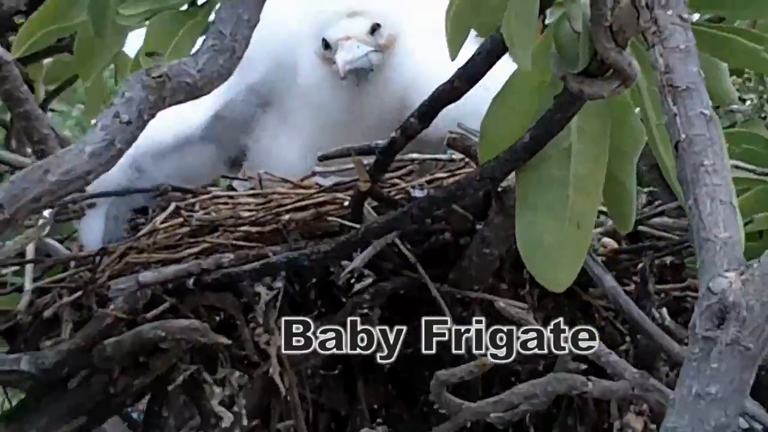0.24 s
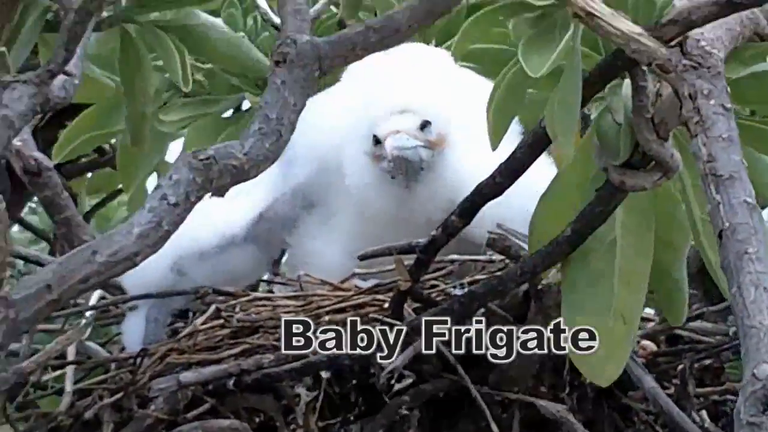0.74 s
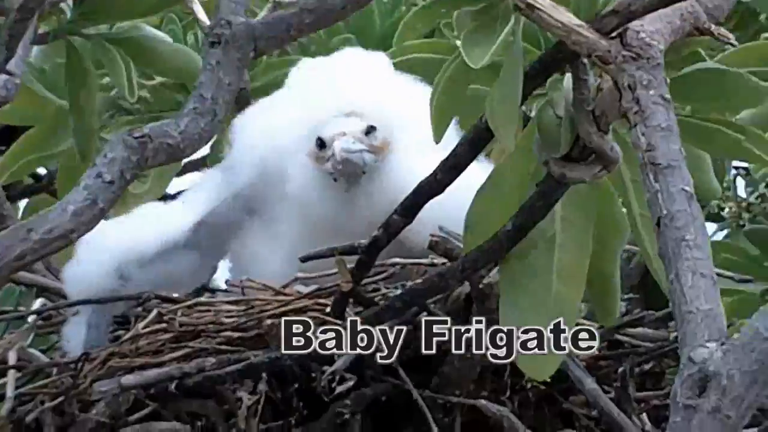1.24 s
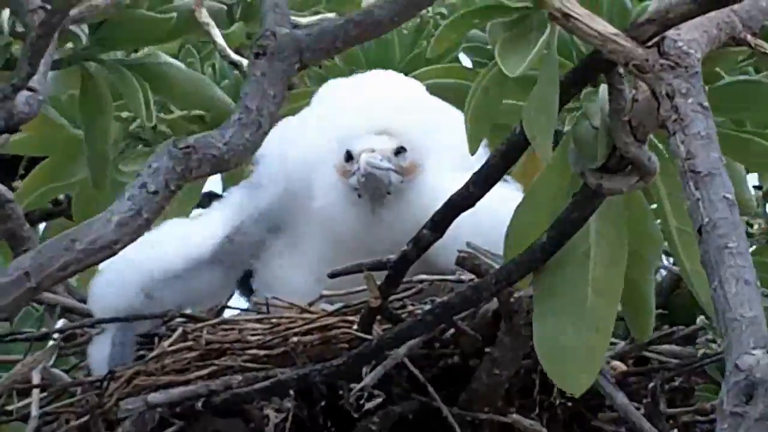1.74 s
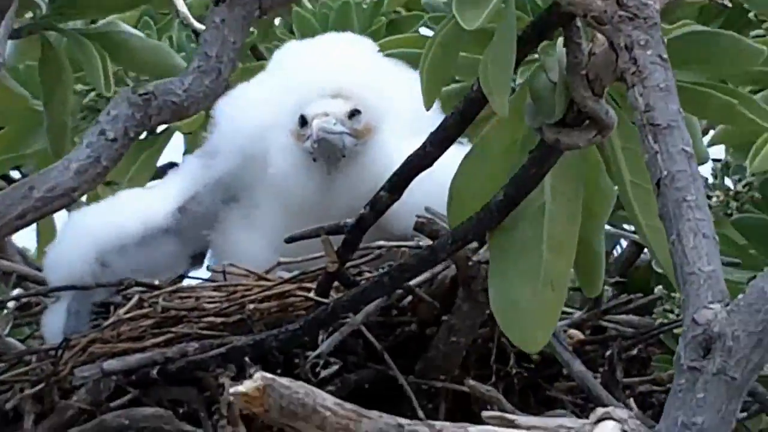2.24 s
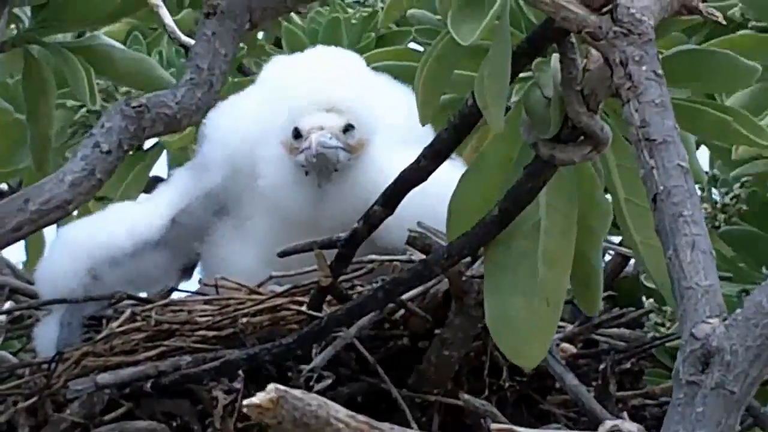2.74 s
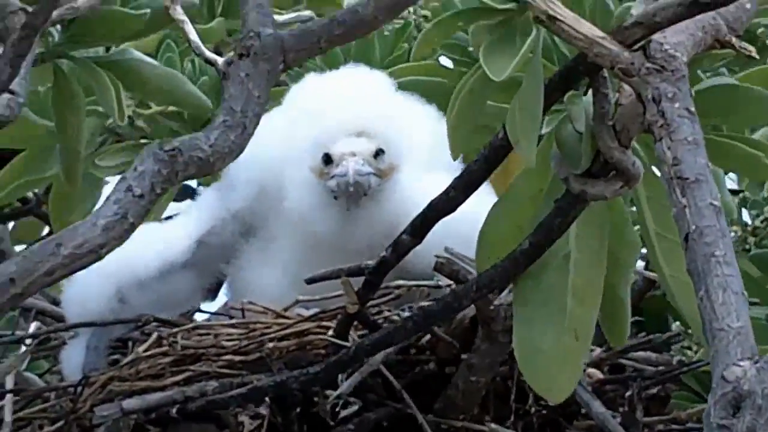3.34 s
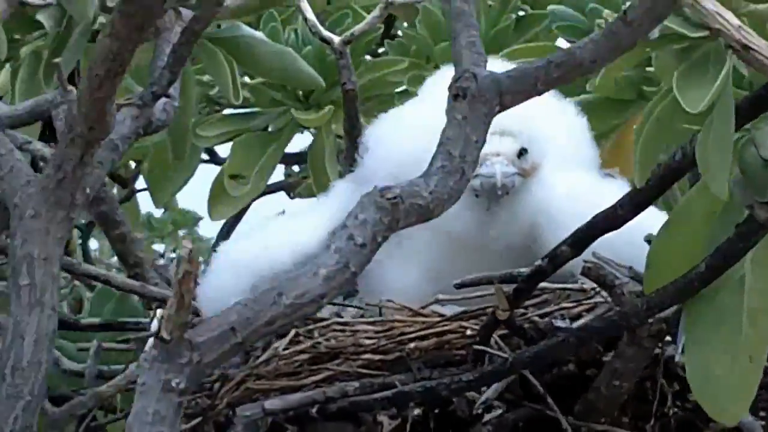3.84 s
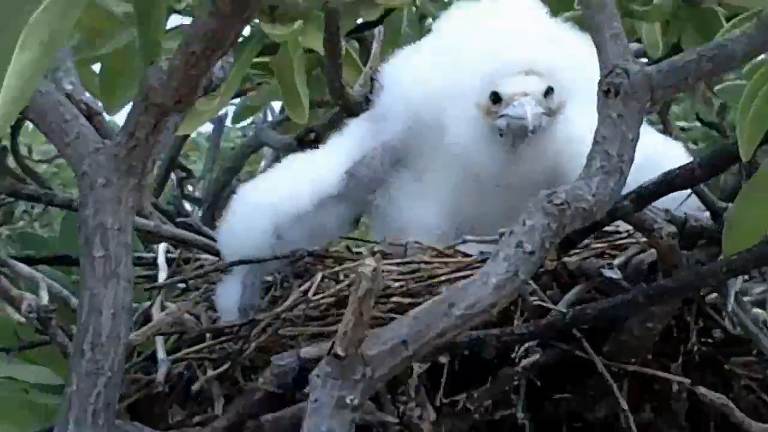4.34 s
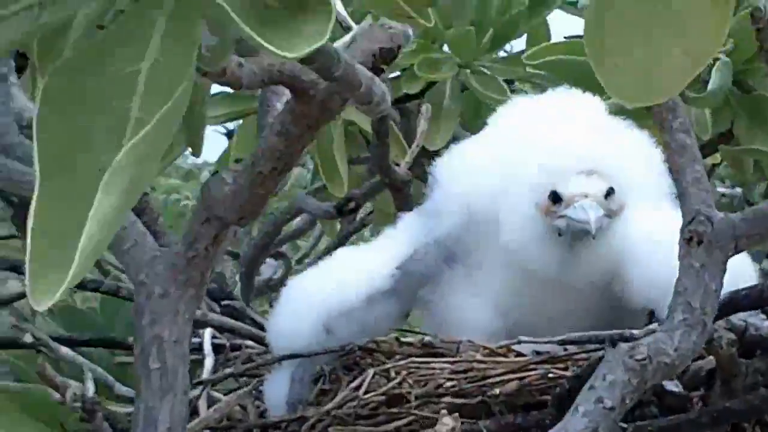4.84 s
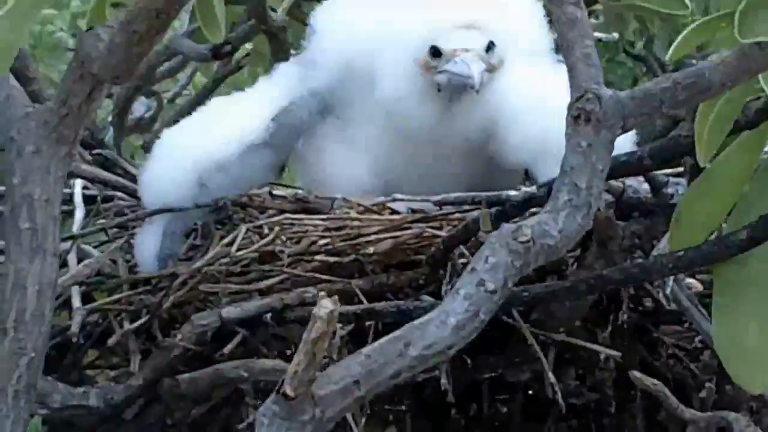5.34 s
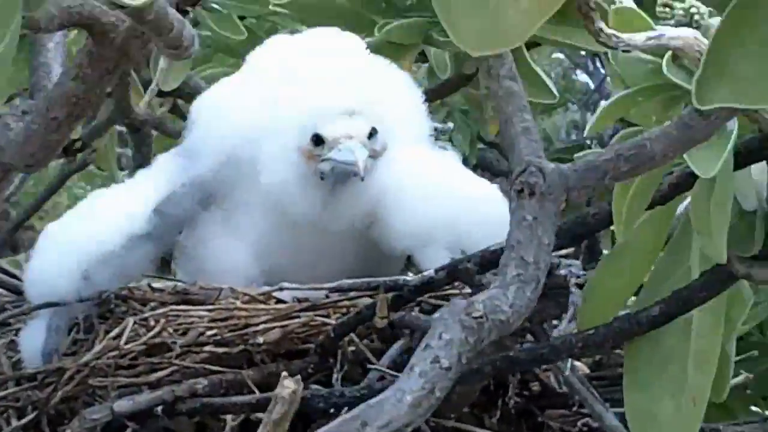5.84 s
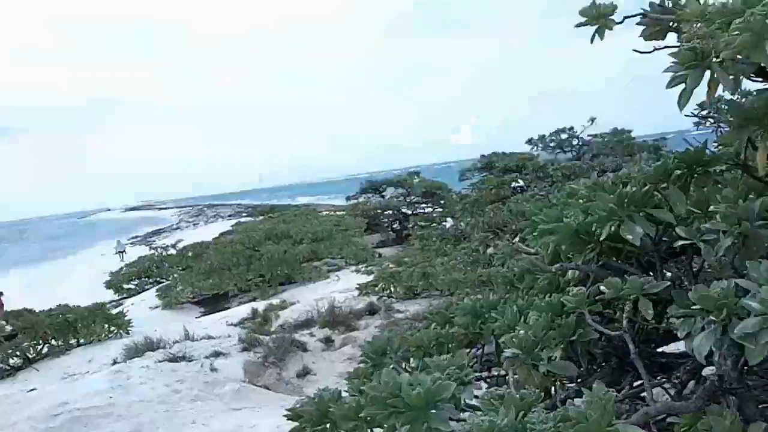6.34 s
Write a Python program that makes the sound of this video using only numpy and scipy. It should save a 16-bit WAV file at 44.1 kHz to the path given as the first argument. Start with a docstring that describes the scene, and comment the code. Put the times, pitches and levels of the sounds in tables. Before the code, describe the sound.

Continuous seabird colony chatter, bright and nasal, with quick individual yelps rising from the blurred mass. Underneath are faint far breakers and uneven low wind, with dull pops as gusts hit the small microphone and briefly dip the birds. After four seconds one nearby tern gives a short two-part screech; buffeting then stops, the chorus continues, and it abruptly recedes in the final instant.

```python
"""A tern colony on a reef island, heard from inside a bush through a small camera microphone. From the start,
hundreds of short harmonic calls merge into a chorus, with single cries standing out, over a filtered-noise wash
of far surf and low wind noise; eddies strike the microphone until 4.6 s. At 4.0 s one close bird screams: a
rising note that leaps in pitch, then a harsh falling one. From 6.47 s, near the end, all the birds abruptly
fall 15 dB in level."""
import sys
import numpy as np
from scipy import signal
from scipy.fft import rfft, irfft, next_fast_len
from scipy.io import wavfile
from scipy.ndimage import uniform_filter1d

SR = 44100
rng = np.random.default_rng(int(sys.argv[2]) if len(sys.argv) > 2 else 0)


def to_wav(s):
    """Save 16-bit WAV."""
    ch = np.atleast_2d(s).T  # columns
    pcm = np.round(np.clip(ch, -1, 1) * 32767)  # PCM
    wavfile.write(sys.argv[1], SR, pcm.astype(np.int16))


N = 290393
TIME = np.arange(N) / SR  # t/s

# Level of the distant chorus, before trims: t/s, body level/dB, treble level relative to the body/dB
CHORUS_LEVEL = [(0, -49.5, -5), (.25, -48, 2), (.58, -48.5, -1), (.8, -43.5, -.5), (1.27, -53, 5.5),
                (1.72, -44, -5), (1.89, -48, -4.5), (2.1, -49, 2), (2.33, -52, -1.5), (2.62, -55, 2),
                (2.98, -47, -0.5), (3.3, -49.5, -3.5), (3.62, -50, 2), (3.96, -56.5, 0), (4.3, -44.5, -2.5),
                (4.52, -56, -1), (4.75, -49, 0), (5.25, -52.5, 1.5), (5.7, -48.5, -3), (6, -48, 1),
                (6.13, -51, 0.5), (6.3, -45, -1.5)]
# Relative strength of the harmonics of a distant call, without its throat resonance: f/Hz, level/dB
CHORUS_COLOUR = [(600, -25), (1200, -17), (1600, -7.5), (2100, 3), (2400, 3), (3100, 1), (3700, -2),
                 (4300, -0.5), (4900, 0.5), (7000, -6.5)]
# Cries at middle distance, before trims: t/s, length/s, middle f/Hz, glide from start to end/Hz, level/dB
CRIES = [(0.233, 0.082, 916, 209.5, -43.5), (0.36, .057, 881, -6, -48), (0.478, 0.1, 773, 111, -48.5),
         (0.618, .083, 743, 123, -43), (0.659, 0.096, 900, 95, -40.5), (0.742, 0.036, 791, -140, -45),
         (.781, .059, 775, 209, -45.5), (0.917, .08, 880, 201.5, -44.5), (0.982, 0.061, 923, -110, -39.5),
         (1.052, 0.059, 985, 300.5, -43.5), (1.121, .045, 1054, -68, -42), (1.205, 0.036, 844, 144, -44.5),
         (1.41, 0.0616, 838, 42, -47.5), (1.658, .1, 832, 58, -48), (1.746, .04, 747, 111.5, -45),
         (1.954, 0.11, 861, 110.5, -45), (2.085, 0.043, 877, 32.5, -46.5), (2.146, .065, 906, -40.5, -40.5),
         (2.423, 0.067, 907, -20, -46.5), (2.486, .07, 787, 128, -46), (3.023, 0.046, 690, -36, -43),
         (3.423, 0.087, 848, 49.5, -45.5), (3.618, .068, 886, -12, -44.5), (3.798, 0.11, 800, 55, -49.5),
         (3.914, 0.047, 769, -200, -48), (4.729, 0.097, 910, 147, -52), (4.899, .11, 883, 167, -47),
         (5.784, 0.088, 855, 2.5, -49), (5.995, 0.066, 924, -14, -45), (6.081, .039, 910, -87.5, -44),
         (6.159, .1, 694, 138.5, -44.5), (6.222, .095, 785, 77.5, -42), (6.315, 0.049, 776, 76.5, -41.5)]
# Relative strength of the harmonics of a cry, without its throat resonance: f/Hz, level/dB
CRY_COLOUR = [(600, -18.5), (1000, -10.5), (1500, -3.5), (2100, 0.5), (3000, 0.5), (4000, -4), (4900, 0),
              (6200, -0.5), (7500, -3.5)]
# The close bird's scream, one curve for each of its two notes: t/s, f/Hz, level/dB
SCREAM = [
    [(4.000, 603, -45.5), (4.035, 680.4, -32.5), (4.057, 733, -37.5), (4.080, 774, -30),
     (4.100, 796, -37.5), (4.131, 784, -32.5), (4.151, 946, -37), (4.173, 1035, -30), (4.189, 1066, -39),
     (4.197, 990, -50)],
    [(4.2045, 1014, -49), (4.207, 1009, -31), (4.217, 953, -33.5), (4.227, 795, -39.5), (4.238, 792, -31.5),
     (4.258, 718, -64)],
]
# Relative strength of the harmonics of the scream, without its throat resonance: f/Hz, level/dB
SCREAM_COLOUR = [(600, -12), (1000, -10), (1500, -13), (2100, -6), (3000, -6), (4000, -5.5), (4900, 1),
                 (6200, 4), (7500, -6.5)]
# Level of the surf, before its trim: t/s, level/dB
SURF_LEVEL = [(0, -55), (1.1, -52), (2, -56), (3.6, -59.5), (4.4, -57.5), (6.4, -56), (6.58, -62.5)]
# Relative spectral density of the surf: f/Hz, level per Hz/dB
SURF_SPECTRUM = [(20, 3.5), (60, -3), (150, 3), (300, -0.5), (600, 2.5), (1200, -1.5), (2500, 1),
                 (5000, -11), (7500, -9)]
# Strength of the wind at the microphone: t/s, level/dB
WIND_LEVEL = [(0, -33), (.25, -39.5), (.72, -33), (1.07, -42), (1.23, -35), (1.42, -39.5), (1.6, -36.5),
              (2.02, -41.5), (2.15, -32.5), (2.26, -51), (2.42, -41), (3.05, -32.5), (3.3, -44),
              (3.58, -37.5), (3.76, -47), (3.9, -40.5), (4.1, -54.5), (4.68, -35.5), (4.87, -45.5),
              (5.2, -49.5), (6.44, -51), (6.54, -38)]
# Relative spectral density of the wind rumble, before it is made lumpy: f/Hz, level per Hz/dB
WIND_SPECTRUM = [(10, -5.5), (25, 3), (45, 1.5), (80, -2), (140, -7.5), (220, -16.5), (350, -28),
                 (700, -46), (1500, -69.5), (3000, -90.5)]
# Eddies that strike the microphone: t/s, peak level/dB, decay length/s, time from suction to push/s
BUFFETS = [(0.103, -24, 0.0067, 0.00068), (0.344, -25, 0.0018, 0.0011), (.478, -25.5, 0.0026, .00055),
           (.693, -26, .0033, 0.001), (0.779, -28.5, .004, 0.0011), (1.195, -25.5, 0.0055, 0.00093),
           (1.211, -23.5, .0028, 0.0013), (1.353, -27.5, 0.0057, 0.0013), (1.59, -28, .005, 0.0012),
           (1.816, -21.5, 0.0079, 0.00061), (2.632, -26.5, 0.00099, 0.00094),
           (2.65, -31.5, 0.0044, 0.00026), (2.66, -28.5, 0.0014, 0.00025), (2.839, -27, 0.0016, 0.00058),
           (2.982, -29, 0.0044, 0.00054), (3.116, -29.5, 0.0044, 0.0012), (3.595, -27.5, .004, 0.0011),
           (4.457, -27.5, .0028, 0.0011), (4.476, -27.5, .004, 0.00058), (4.601, -28, .018, 0.00079),
           (4.619, -21, 0.0099, 0.00049)]
# Frequency response of the microphone: f/Hz, level/dB
MIC_RESPONSE = [(20, 0), (4850, 2), (5050, -5), (5350, -13), (5800, -14), (6400, -11.5), (7200, -15),
                (7500, -45)]
# Notches of the camera's noise filter: f/Hz, width/Hz
FILTER_NOTCHES = [(2705, 566), (5500, 330)]


def chorus(body_db=0.0, treble_db=-1.0, split_hz=2750):
    """Superposition of many calls: a blurred far mass under clearer nearer birds, in two varying bands."""
    far = flock(count=90, repeats=8, rough=.25, spread_db=4, throat_db=5)
    nearer = flock(count=270, repeats=1, rough=.14, spread_db=3, throat_db=9)
    calls = scatter(far, t60=.3, wet_db=-8) + 1.6 * scatter(nearer, t60=.15, wet_db=-14)
    body = shaped(calls, lambda f: 1 / (1 + (f / split_hz) ** 16))
    treble = calls - body
    db, bright_db = follow(CHORUS_LEVEL, TIME)
    body_part = gain_of(body_db) * steady(body)
    treble_part = gain_of(bright_db + treble_db) * steady(treble)
    return gain_of(db) * (body_part + treble_part)


def flock(count, repeats, rough, spread_db, throat_db, pitch_hz=790):
    """Random superposition: each bird repeats its own syllable at scattered moments and strengths."""
    out = np.zeros((2, N))
    slots = rng.permutation(count * repeats).reshape(count, repeats)
    for turns in slots:
        length, pitch, rise, bend, throat, pan_db = rng.standard_normal(6)
        middle = pitch_hz * np.exp(.12 * pitch)
        first = .87 - .11 * rise  # end pitches relative to the middle
        last = .93 + .12 * rise + .04 * bend
        hz = arch(.056 * np.exp(.25 * length), middle * first, middle, middle * last)
        throat_hz = middle * 3.55 * np.exp(0.36 * throat)
        cry = tern(hz, rough, throat_hz, CHORUS_COLOUR, throat_db)
        cry = cry * signal.windows.tukey(len(hz), .4)
        for slot, (late, loud) in zip(turns, rng.random((repeats, 2))):
            start_s = (slot + 2 * late - 2) / slots.size * N / SR
            add(out, start_s, gain_of(spread_db * (2 * loud - 1)) * cry, pan_db)
    return evened(out)


def neighbours(level_db=-1.0):
    """Resonance tied to pitch: a higher cry has a wider beak, so its resonance climbs faster than its pitch."""
    out = np.zeros((2, N))
    for s, length, pitch, glide, db in CRIES:
        ends = pitch * (1 - .025)  # both ends lie under a straight glide
        hz = arch(length, ends - glide / 2, pitch, ends + glide / 2)
        throat_hz = 2740 * (pitch / 799) ** 1.62  # 2740 Hz at a pitch of 799 Hz
        cry = tern(hz, .18, throat_hz, CRY_COLOUR, throat_db=16.0, throat_width=490)
        cry = cry * signal.windows.tukey(len(hz), .4)
        add(out, s, gain_of(db + level_db) * cry, rng.normal(0, 1.5))
    return out


def close_bird(level_db=0., pan_db=-1., breaks=0.66, shut_db=-5., muffle_hz=4200):
    """Source and filter: the opening beak raises the resonance, and a fast pitch slide roughens the voice."""
    beak_shut_hz, beak_open_hz = 2270, 3220  # throat resonance at the two extremes
    beak_opens_hz, beak_span_hz = 160, 22  # height above the note's lowest pitch, and span of the opening
    held_rough, rough_per_hz_s = 0.087, .00003  # nearly clean on a held pitch, rougher as it slides
    out = np.zeros((2, N))
    for note in SCREAM:
        t = np.arange(note[0][0], note[-1][0], 1 / SR)
        hz, db = follow(note, t)
        slide = uniform_filter1d(abs(np.gradient(hz)) * SR, size=600)  # Hz per second
        rough = np.minimum(held_rough + rough_per_hz_s * slide, .45)
        beak = (1 + np.tanh((hz - hz.min() - beak_opens_hz) / beak_span_hz)) / 2  # 0 shut, 1 open
        throat_hz = beak_shut_hz + (beak_open_hz - beak_shut_hz) * beak
        voice = tern(hz, rough, throat_hz, SCREAM_COLOUR, throat_db=20.5, throat_width=900,
                     jitter=0.065, rasp=0.94)
        # a shut beak holds back the top harmonics
        dull = shaped(voice, lambda f: 1 / (1 + (f / muffle_hz) ** 8))
        voice = dull + gain_of(shut_db * (1 - beak)) * (voice - dull)
        # where the voice breaks, pulses alternate unevenly and fill the gaps between the harmonics
        half_pitch = np.sin(np.pi * np.cumsum(hz) / SR)
        uneven = breaks * rough * wander(len(t), 500) * half_pitch
        add(out, t[0], gain_of(db + level_db) * voice * (1 + uneven), pan_db)
    return out


def tern(hz, rough, throat_hz, colour, throat_db, throat_width=550, jitter=0.035, rasp=1.5):
    """Harmonic series through one resonance; roughness modulates both its frequency and its amplitude."""
    n = len(hz)
    turns = np.cumsum(hz * (1 + jitter * rough * wander(n, 600))) / SR
    k = np.arange(1, 10)[:, None]  # harmonic numbers
    resonance_db = throat_db / (1 + ((k * hz - throat_hz) / throat_width) ** 2)
    size = gain_of(read(colour, k * hz) + resonance_db)
    size /= np.sqrt((size ** 2).sum(0) / 2)  # constant total power
    phase = rng.random(k.shape)  # random phases, in turns, make the voice less peaky
    harmonics = size * np.sin(2 * np.pi * (k * turns + phase))
    return harmonics.sum(0) * (1 + rasp * rough * wander(n, 900))


def arch(length, first, middle, last, sag=.05, waver=0.0096):
    """Pitch follows pressure: a wavering arc that sags at both ends, where pressure builds and fails."""
    u = np.linspace(-1, 1, max(int(length * SR), 64))
    arc = middle + u * (last - first) / 2 + u ** 2 * ((first + last) / 2 - middle)
    return arc * (1 - sag * u ** 6) * (1 + waver * wander(len(u), 108.0))


def scatter(x, t60, wet_db):
    """Multiple scattering: ground and bushes return a sparse, decaying train of random echoes."""
    t = np.arange(SR // 2) / SR
    noise = rng.standard_normal((3, len(t)))
    struck = rng.random((3, len(t))) < 1500 / SR  # about 1500 echoes a second
    taps = noise * struck * gain_of(-60 * t / t60) * (t > .004)
    tail = taps[0] + 0.12 * taps[1:]  # nearly alike, as the two ports are close together
    tail = tail / np.linalg.norm(tail[0])
    return x + gain_of(wet_db) * signal.fftconvolve(x, tail, axes=1)[:, :N]


def surf(level_db=6.5, width=0.064):
    """Broadband noise: the wash of far breakers is shaped noise, nearly equal in both channels."""
    mid, side = shaped(rng.standard_normal((2, N)), lambda f: gain_of(read(SURF_SPECTRUM, f)))
    side = width * shaped(side, lambda f: f / (f + 300))
    wash = evened(np.array([mid + side, mid - side]))
    return gain_of(follow(SURF_LEVEL, TIME)[0] + level_db) * wash


def wind(level_db=0.0, lumps_db=5.0, flutter_db=-18.0, flutter_hz=220, width=0.067):
    """Turbulent pressure: lumpy low rumble whose strongest lumps break into a higher flutter."""
    slow, fast, side = rng.standard_normal((3, N))
    rumble = shaped(slow, lambda f: gain_of(read(WIND_SPECTRUM, f)))
    rumble = evened(rumble * gain_of(lumps_db * wander(N, 45)))
    rumble = rumble / np.sqrt(abs(uniform_filter1d(rumble ** 2, size=6000)) + 1e-6)
    # a little independent noise widens the flutter
    stereo = np.array([fast + width * side, fast - width * side])
    flutter = shaped(stereo, lambda f: f / flutter_hz / (1 + (f / flutter_hz) ** 4))
    flutter = evened(flutter * np.minimum(rumble ** 2, 5))
    speed = gain_of(follow(WIND_LEVEL, TIME)[0])
    flutter_gain = gain_of(flutter_db) * np.sqrt(speed / speed.max())
    return gain_of(level_db) * speed * (rumble + flutter_gain * flutter)


def buffets(level_db=0.):
    """Pressure transient: a passing eddy sucks, flips quickly to a push and fades."""
    out = np.zeros((2, N))
    t = np.arange(-SR // 20, SR // 20) / SR
    for s, db, length, edge in BUFFETS:
        flip = np.tanh(t / edge) * np.exp(-abs(t) / length)
        add(out, s + t[0], gain_of(db + level_db) * flip / flip.max())
    return out


def gain_of(db):
    """Logarithmic level: decibels to an amplitude factor."""
    return 10 ** (np.asarray(db) / 20)


def evened(x):
    """Normalisation of power: scales to an rms of one."""
    return x / np.sqrt(np.mean(x ** 2) + 1e-20)


def steady(x):
    """Short-time normalisation: divides by the running rms of both channels, so that slow swells vanish."""
    return x / np.sqrt(abs(uniform_filter1d((x ** 2).mean(0), size=6000)) + 1e-9)


def read(points, hz):
    """Interpolation of a spectrum on a logarithmic frequency axis."""
    f, value = np.transpose(points)
    return np.interp(np.log(hz + 1), np.log(f + 1), value)


def follow(rows, t):
    """Linear interpolation in time of every column of a curve table."""
    s, *columns = np.transpose(rows)
    return [np.interp(t, s, c) for c in columns]


def shaped(x, gain):
    """Linear filtering: multiplies the spectrum by a gain given as a function of frequency."""
    size = next_fast_len(x.shape[-1] + 4096)
    spectrum = rfft(x, size) * gain(np.fft.rfftfreq(size, 1 / SR))
    return irfft(spectrum, size)[..., :x.shape[-1]]


def wander(n, rate):
    """Slow random variation: straight lines join random values of about unit size, rate of them a second."""
    return np.interp(np.arange(n) * rate / SR, np.arange(4096), rng.standard_normal(4096))


def add(mix, s, sound, pan_db=0):
    """Superposition: adds a sound at time s; a positive level difference leans it to the left."""
    part = mix[:, max(round(s * SR), 0):][:, :len(sound)]
    part += gain_of([[pan_db / 2], [-pan_db / 2]]) * sound[:part.shape[1]]


def scene(balance_db=-0.7):
    """Superposition of birds, surf and wind; near the end the birds abruptly weaken."""
    cries = scatter(neighbours(), t60=0.081, wet_db=-11)
    scream = scatter(close_bird(), t60=0.23, wet_db=-14.5)
    birds = chorus() + cries + scream
    drop_s, drop_db = 6.472, -15
    drop = gain_of(drop_db * np.clip((TIME - drop_s) / 0.009, 0, 1))
    balance = gain_of([[balance_db / 2], [-balance_db / 2]])
    return (birds * drop + surf()) * balance + wind() + buffets()


def record(dry, threshold_db=-28.5, slope=0.96, recovery_db=106.0, edge_hz=7450):
    """Gain control: strong lows, as in hard buffets, dip the upper sound; then noise filter and band limit."""
    low = shaped(dry, lambda f: 1 / (1 + (f / 700) ** 4))
    power_db = 10 * np.log10(abs(uniform_filter1d((low ** 2).mean(0), size=300)) + 1e-12)
    # the detector holds each peak and lets it fall by recovery_db a second
    fall = TIME * recovery_db
    held_db = np.maximum.accumulate(power_db + fall) - fall
    over_db = np.maximum(held_db - threshold_db, 0)
    ducked = low + (dry - low) / gain_of(slope * uniform_filter1d(over_db, size=200))

    def notches(f):
        """Rejection: each notch of the noise filter cancels its centre frequency."""
        return np.prod([abs(f - hz) / np.hypot(f - hz, width / 2) for hz, width in FILTER_NOTCHES], axis=0)

    coloured = shaped(ducked, lambda f: gain_of(read(MIC_RESPONSE, f)) * notches(f))
    band_limit = signal.firwin(1023, edge_hz, window=("kaiser", 9), fs=SR)
    return signal.oaconvolve(coloured, band_limit[None], "same")


dry = scene()
out = record(dry)
to_wav(out)
```